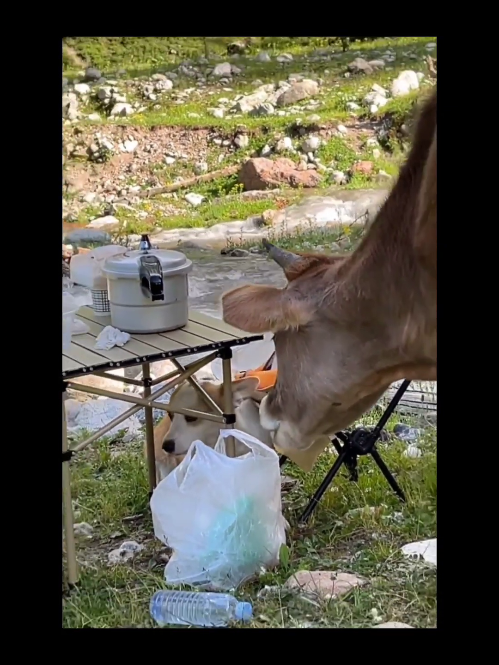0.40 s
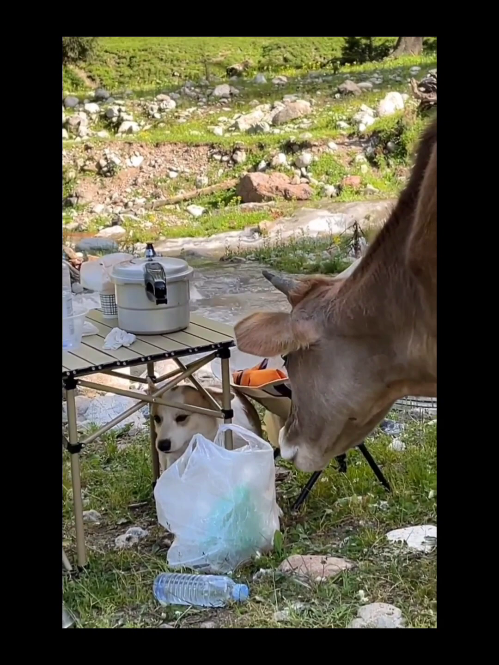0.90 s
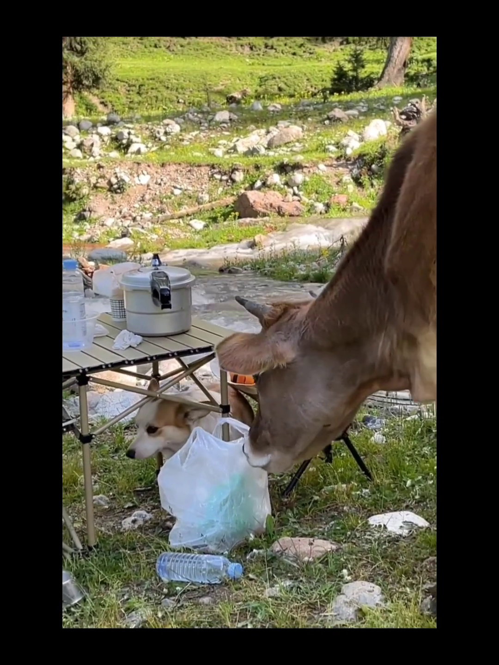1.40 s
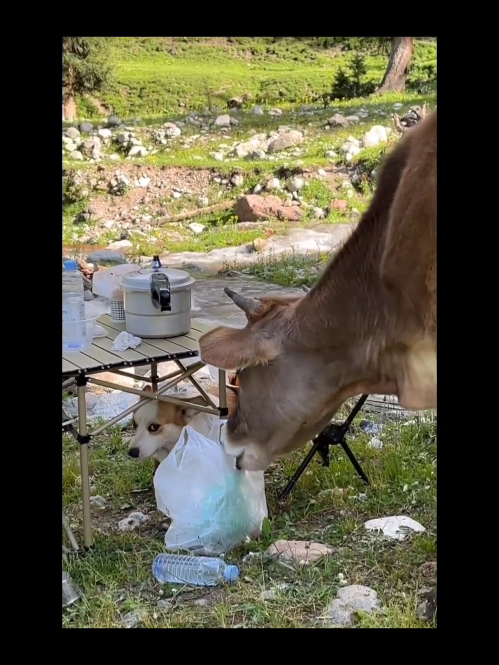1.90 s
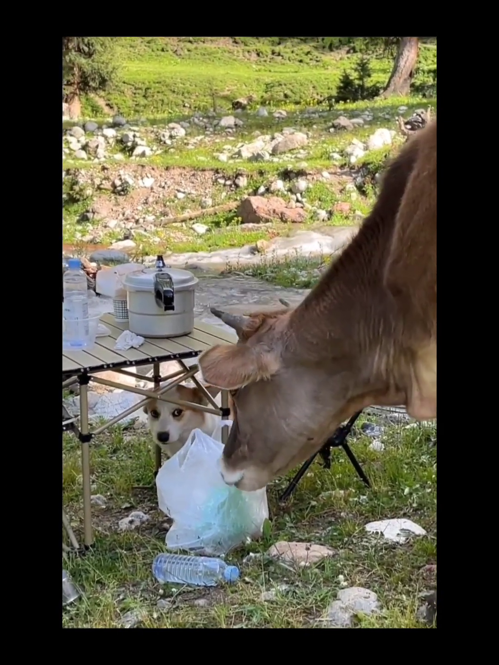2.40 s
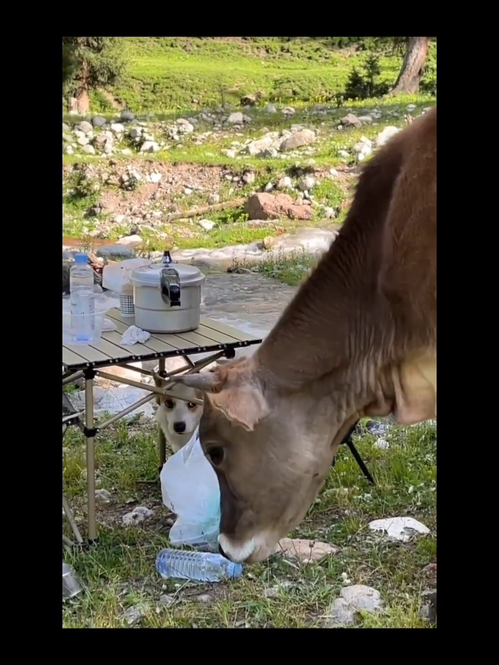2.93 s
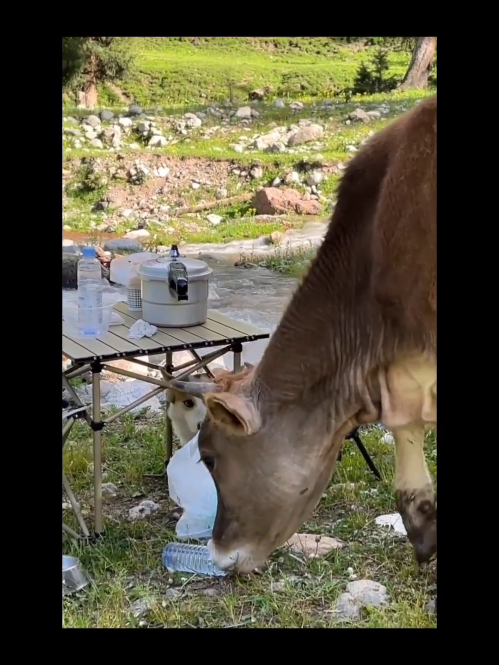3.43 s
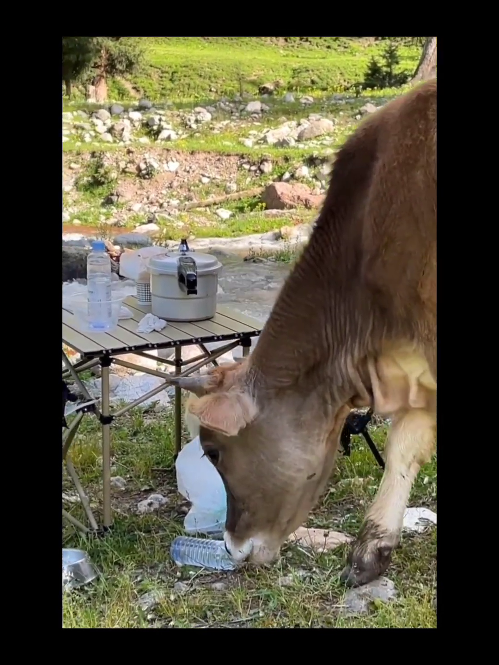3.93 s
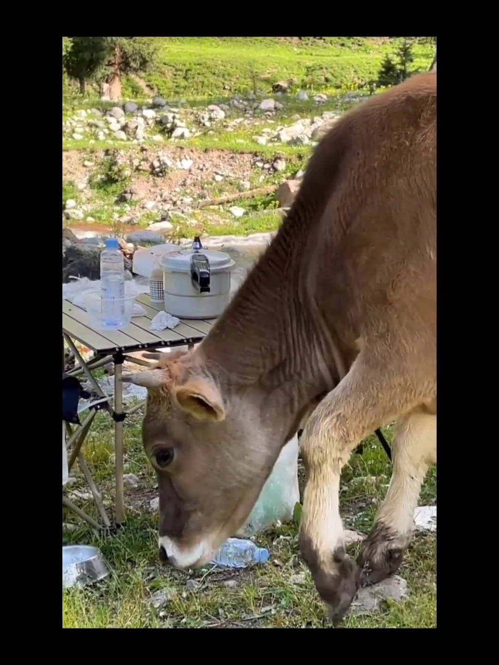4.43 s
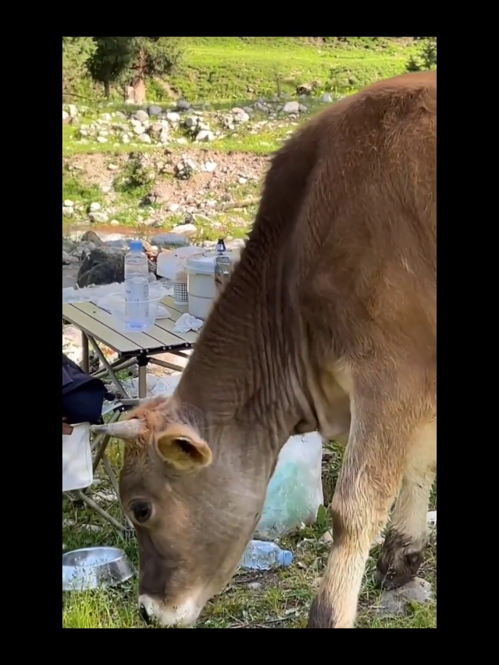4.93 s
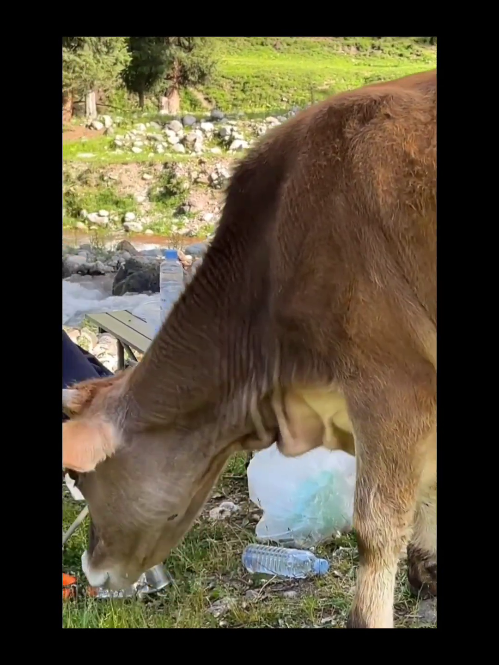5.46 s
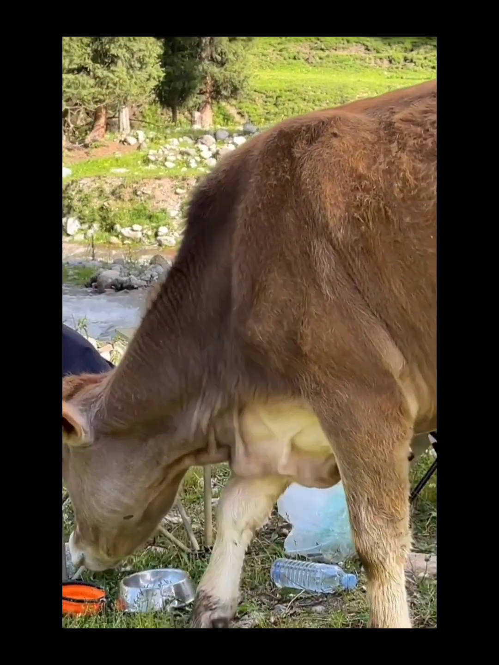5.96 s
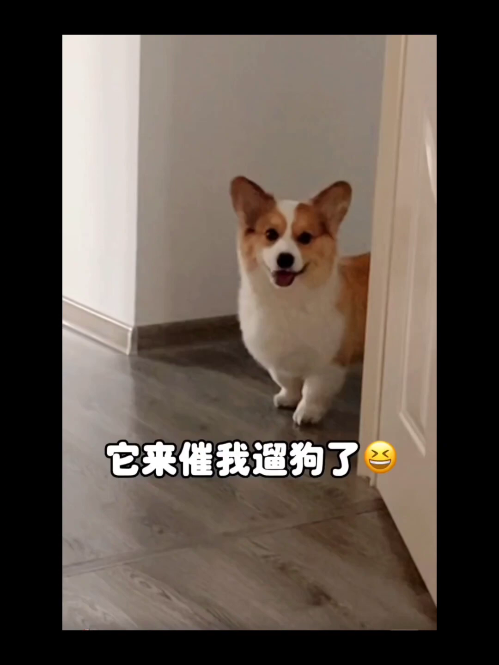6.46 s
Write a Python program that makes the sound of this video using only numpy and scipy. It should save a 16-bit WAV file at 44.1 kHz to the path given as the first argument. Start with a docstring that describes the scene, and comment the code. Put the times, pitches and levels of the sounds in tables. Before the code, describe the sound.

Outdoors beside a fast stream, water rushes continuously over rocks some way off: deep rumble, gurgling mid rush and patchy bright spray. A hand-held phone catches wind pops and buffeting on the left at the very start, briefly before one second, and thickly in the last half second. Faint thin high tones sit in the hiss. It stops short. The grazing cow and the dog make no sound.

```python
"""A fast stream rushes over rocks some way off, heard by a hand-held phone with two microphone ports.
Plunging water rumbles, rapids rush and gurgle, spray hisses: patchy noise with swarms of bubble rings.
Thin tones stand in quiet slices of the top hiss, one slice flickers. Gusts pop on the left as falling
chirps over noise buffets, and push the phone's gain down. The sound stops short with a faint low murmur."""
import sys
import numpy as np
from scipy import signal
from scipy.fft import rfft, irfft, next_fast_len
from scipy.io import wavfile
from scipy.ndimage import uniform_filter1d, map_coordinates

SR = 44100
rng = np.random.default_rng(int(sys.argv[2]) if len(sys.argv) > 2 else 0)


def to_wav(s):
    """Save 16-bit WAV."""
    ch = np.atleast_2d(s).T  # columns
    pcm = np.round(np.clip(ch, -1, 1) * 32767)  # PCM
    wavfile.write(sys.argv[1], SR, pcm.astype(np.int16))


def voltage_ratio(level):
    """Linear amplitude factor for a level in decibels (scalar or array-like)."""
    return 10 ** (np.asarray(level, float) / 20)


N = 290604


def unit(x):
    """Scales a sound, or a pair taken together, to an rms of 1."""
    return x / np.sqrt(np.mean(x ** 2) + 1e-20)


def curve(points):
    """One value per sample, on straight lines between (time [s], value) points."""
    s, value = np.transpose(points)
    return np.interp(np.arange(N) / SR, s, value)


def along(points, hz):
    """Values at hz, between (frequency [Hz], value) points on a log axis."""
    f, value = np.transpose(points)
    return np.interp(np.log(hz + 1), np.log(f + 1), value)


def wobble(rate):
    """A smooth random curve, rate knots a second."""
    knots = rng.standard_normal(int(N * rate / SR) + 4)
    return map_coordinates(knots, [np.arange(N) * rate / SR])


def filtered(x, response):
    """Filters x by a real or complex response of frequency."""
    m = next_fast_len(N + 8192)
    spectrum = rfft(x, m) * response(np.fft.rfftfreq(m, 1 / SR))
    return irfft(spectrum, m)[..., :N]


def stream():
    """The flow of the whole stream drives its rumble, its rush and its spray, each by its own share."""
    # The flow, as the level of the spray: (time [s], level [dB])
    flow = [(0, -27.5), (.8, -27), (1.1, -28), (1.6, -25.5), (2.3, -24.5), (2.6, -26), (3.4, -24.5),
            (4.2, -26.5), (4.7, -25), (5.2, -27), (5.6, -29), (5.85, -29.5), (6.05, -27.5)]
    spray_db = curve(flow)
    swell_db = spray_db - spray_db.mean()
    surge_db = 0.22 * wobble(rate=7.2) + 0.85 * wobble(rate=16)  # quick swells shared by rapids and spray
    return rumble(swell_db) + rush(swell_db, surge_db) + spray(spray_db, surge_db)


def rumble(swell_db):
    """Big plunges of water rumble: low noise that follows the flow a little and swells on its own."""
    # Colour of the rumble: (frequency [Hz], relative level [dB])
    colour = [(20, -50), (31, -37.5), (45, -14.5), (60, -8), (85, -5.5), (125, -2.5), (180, -1.5),
              (215, -5.5), (260, -9), (400, -16.5), (700, -99)]
    # Its own slow swells: (time [s], level [dB])
    roar = [(0, -4), (.6, -0.5), (1.2, -2.5), (1.7, -1.5), (2.4, -1), (3, -0.5), (3.7, -1), (4.3, -1),
            (4.8, 0), (5.3, -1), (5.6, -1.5), (5.8, -2.5), (6.05, 1)]
    level_db = -15 + 0.22 * swell_db + curve(roar)
    churn_db = 0.56 * wobble(rate=3.8) + 0.84 * wobble(rate=14)
    return voltage_ratio(level_db + churn_db) * water(colour, patchy_db=0.6)


def rush(swell_db, surge_db):
    """The rapids rush as mid-range noise, with trapped air gurgling in it as slow-dying bubble rings."""
    # Colour of the rapids: (frequency [Hz], relative level [dB])
    colour = [(120, -95.5), (250, -21), (400, -7), (490, -4), (540, -7.5), (700, -7.5), (850, -12.5),
              (1200, -16), (1400, -23.5), (1900, -27), (4000, -99)]
    gurgle = voltage_ratio(-14.5) * bubbles(count=2500, mid_hz=701.4, spread=0.8914, turns=8.72, size_db=3, size=1000)
    level_db = -18.5 + 0.76 * swell_db + surge_db
    return voltage_ratio(level_db) * water(colour, patchy_db=0.6, grains=gurgle)


def spray(spray_db, surge_db):
    """Spray hisses as patchy bright noise, with splashes and the fizz of tiny bubbles ringing in it."""
    # Colour of the hiss: (frequency [Hz], relative level [dB])
    colour = [(700, -56), (1300, -2), (1800, -7), (2350, -2), (2570, -2.5), (2770, -4), (4100, -10.5),
              (4600, -8), (5300, -9.5), (6400, -11.5), (7600, -12.5), (7700, -20.5), (9200, -15),
              (11500, -20), (13200, -19), (13700, -22.5), (14300, -25)]
    splash = voltage_ratio(-17) * bubbles(count=2500, mid_hz=2915, spread=0.595, turns=12, size_db=4.5, size=400)
    fizz = voltage_ratio(-11.0) * bubbles(count=7000, mid_hz=5160, spread=0.797, turns=3.9, size_db=4.5)
    hiss = water(colour, patchy_db=1.86, grains=fizz + splash)
    hiss = voltage_ratio(spray_db + 0.75 * surge_db) * hiss
    # The hiss thins at the very top
    return filtered(hiss, lambda hz: voltage_ratio(np.interp(hz, [14350, 14500, 15400], [0, -7, -12])))


def water(spectrum, patchy_db, grains=0):
    """Two unrelated strands of rms 1: noise plus grains, in shared patches of random strength."""
    z = signal.stft(rng.standard_normal((2, N)) + grains, nperseg=512)[2]
    field = rng.standard_normal(z.shape[1:])
    field = uniform_filter1d(field, size=2, axis=0)  # patch height in frequency bins
    field = uniform_filter1d(field, size=5, axis=1)  # patch length in frames
    pair = signal.istft(z * voltage_ratio(patchy_db * unit(field)), nperseg=512)[1][:, :N]
    return unit(filtered(pair, lambda hz: voltage_ratio(along(spectrum, hz))))


def bubbles(count, mid_hz, spread, turns, size_db, size=256):
    """Two unrelated swarms of short damped rings, soft at the start, pitch rising as they near the surface."""
    when, pitch, loud = rng.random((3, 2 * count))
    hz = np.clip(mid_hz * np.exp(spread * (2 * pitch - 1)), 60, 15000)[:, None]
    cycle = np.arange(size) * hz / SR
    life = cycle / turns
    envelope = life * np.exp(-3 * life) * np.sqrt(hz)
    ring = np.sin(2 * np.pi * cycle * (1 + 0.118 * life)) * envelope
    ring *= voltage_ratio(size_db * (2 * loud - 1))[:, None]
    # Both swarms are laid on one line of double length, then parted
    at = (when[:, None] * 2 * N).astype(int) + np.arange(size)
    line = np.bincount(at.ravel(), ring.ravel(), 2 * N + size)[:2 * N]
    return unit(line.reshape(2, N))


def ports(strands):
    """Left and right share one strand, shaded and phase-shifted at the left; the other sets them apart."""
    # How left and right differ in level, phase and likeness
    # Left over right: (frequency [Hz], level [dB])
    shade = [(100, 0), (180, -1), (260, -3), (400, -10), (520, -11), (700, -6), (850, 2), (1200, 2),
             (1600, 0), (16000, 0)]
    # Left ahead of right: (frequency [Hz], phase lead [rad])
    lead = [(40, 0), (260, -.6), (500, -1.5), (600, -4.2), (950, -5.5), (1300, -6.3), (1850, -6.3),
            (2350, -4.6), (2580, -3.5), (2800, -4.2), (3750, -5.7), (4500, -4.8), (5050, -5), (5500, -3.14),
            (6350, -3.14), (6700, -2), (7700, 0), (8300, 0), (8900, 1.8), (9600, 0), (11000, 2),
            (12300, .2), (13800, 3.14), (15000, 3.14)]
    # Likeness of the two: (frequency [Hz], correlation [0-1])
    alike = [(40, .92), (110, .87), (230, .9), (380, .72), (560, .2), (750, .8), (1300, .72), (1750, .9),
             (2200, .72), (2450, .85), (2600, .93), (2750, .85), (3000, .7), (3500, .55), (5380, .55),
             (5480, 1), (6120, 1), (6250, .95), (6500, .5), (7650, .4), (7800, .9), (8100, .9), (8300, .3),
             (9400, .6), (11000, .4), (12300, .5), (13600, .3), (13800, 1), (14600, 1), (15000, .3)]

    def mix(hz):
        turn = np.arccos(np.clip(along(alike, hz), 0, 1)) / 2
        return np.array([np.cos(turn), np.sin(turn)])

    common, apart = filtered(strands, mix)
    left = filtered(common + apart, lambda hz: voltage_ratio(along(shade, hz)) * np.exp(1j * along(lead, hz)))
    # The hand sways the phone: the phase between left and right wanders in one band
    sway_rad, sway_hz, sway_width_hz = 0.5, 2600, 400
    hz, s, z = signal.stft(left, SR, nperseg=1024)
    sway = np.interp(s, np.arange(N) / SR, wobble(rate=4.92))
    band = np.exp(-((hz[:, None] - sway_hz) / sway_width_hz) ** 2)
    z = z * np.exp(1j * sway_rad * band * sway)
    left = signal.istft(z, SR, nperseg=1024)[1][:N]
    return np.array([left, common - apart])


def with_thin_tones(x):
    """A slice of hiss goes quiet while a tone of wavering level stands in it; another slice flickers."""
    # Thin tones: (start [s], end [s], pitch [Hz], mean peak level [dB])
    thin_tones = [(0, 3.28, 12920, -55.5), (3.95, 6.05, 12920, -55.5), (.25, 1.8, 12231, -52.5),
                  (3.9, 4.42, 12231, -52.5), (1.28, 1.55, 10164, -51.5), (1.9, 5.9, 10164, -45.5),
                  (1.9, 2.37, 10853, -42.5), (0, 6.05, 14987, -59)]
    below_hz, above_hz = 500, 130  # reach of the quiet slice around its tone
    hz, s, z = signal.stft(x, SR, nperseg=1024)
    t, tones = np.arange(N) / SR, np.zeros(N)
    # One slice of hiss keeps dropping out
    gone = uniform_filter1d(rng.standard_normal(len(s)), size=15) > -.06
    flicker = (hz > 7680) & (hz < 8350)
    z = z * np.where(flicker[:, None] & gone, voltage_ratio(-41.0), 1)
    for start, stop, tone_hz, db in thin_tones:
        inside = (hz > tone_hz - below_hz) & (hz < tone_hz + above_hz)
        during = (s > start) & (s < stop)
        z = z * np.where(inside[:, None] & during, voltage_ratio(-50.0), 1)
        on = uniform_filter1d(1. * ((t > start) & (t < stop)), size=800)  # soft ends
        tones += on * voltage_ratio(db + 3 * wobble(rate=24)) * np.sin(2 * np.pi * tone_hz * t)
    return signal.istft(z, SR, nperseg=1024)[1][:, :N] + tones


def wind():
    """Gusts pop and buffet at the left; the right channel carries them weaker and upside down."""
    pair = np.array([[1], [-.4]])
    return (voltage_ratio(6.5) * pops() + buffets()) * pair


def pops():
    """Each eddy past the port is a pop whose pitch drops from a tick to a thump within a few cycles."""
    # Strong pops: (time [s], relative level [dB])
    puffs = [(0.066, -12), (0.181, -11), (0.864, -11), (5.568, -9), (5.588, -14), (5.618, -13),
             (5.631, -14), (5.657, -10), (5.676, -10), (5.702, -12), (5.734, -12), (5.753, -14),
             (5.781, -11), (5.816, -10), (5.855, -9), (5.874, -11), (5.909, -10), (5.969, -10),
             (6.025, -11)]
    # Spans in which weaker pops come at random: (start [s], end [s])
    gusts = [(.15, .29), (.87, .92)]
    small_per_s, small_db = 30, -16  # the level is on the scale of the strong pops
    out, t = np.zeros(N), np.arange(2048) / SR
    small = [(s + rng.uniform(0, .8 / small_per_s), small_db + rng.normal(0, 1.2))
             for start, stop in gusts for s in np.arange(start, stop, 1 / small_per_s)]
    every = puffs + small
    for (s, db), (bend, thump) in zip(every, rng.standard_normal((len(every), 2))):
        hz = (150 + 1000 * np.exp(-t / .002)) * np.exp(.06 * bend)
        decay = np.exp(-t / .003) + .35 * voltage_ratio(3 * thump) * np.exp(-t / .014)
        shape = (1 - np.exp(-(t / .0016) ** 2)) * decay
        pop = voltage_ratio(db) * shape * np.sin(2 * np.pi * np.cumsum(hz) / SR)
        out[round((s - .002) * SR):][:len(t)] += pop  # starts 2 ms ahead of its listed time
    return out


def buffets():
    """Wind buffets the port: low noise under a quickly fluttering level."""
    # Strength of the buffeting: (time [s], level [dB])
    strength = [(0, -41.5), (.07, -21.5), (.3, -19), (.4, -48.5), (.82, -43.5), (.88, -34), (.97, -53.5),
                (5.1, -47), (5.2, -35), (5.35, -42), (5.57, -22), (5.7, -20), (5.8, -23), (6.05, -25.5)]
    # Its colour: (frequency [Hz], relative level [dB])
    colour = [(30, -32), (60, -8), (140, -2), (250, -13.5), (600, -32), (900, -91.5)]
    level_db = curve(strength) + 2.4 * wobble(rate=44)
    return voltage_ratio(level_db) * water(colour, patchy_db=-2.0)[0]


def scene():
    """The stream at both ports, with thin tones standing in its top hiss, then wind, strongest on the left."""
    return with_thin_tones(ports(stream())) + wind()


def gain_control(x):
    """A peak over the knee pulls both channels down quickly; the gain then climbs back at a steady pace."""
    knee_db, squeeze, recover_db_per_s, attack_s = -8, 0.6, 16, 0.0078
    peak_db = 20 * np.log10(np.abs(x).max(axis=0) + 1e-9)
    need_db = squeeze * np.clip(peak_db - knee_db, 0, None)
    # A running maximum on a rising ramp holds each cut and lets it go at the ramp's pace
    climb_db = recover_db_per_s * np.arange(N) / SR
    held_db = np.maximum.accumulate(need_db + climb_db) - climb_db
    return x * voltage_ratio(-uniform_filter1d(held_db, size=max(1, round(attack_s * SR))))


def band_limit(x):
    """A steep low-pass at the top of the band."""
    return signal.sosfilt(signal.butter(12, 15430, fs=SR, output="sos"), x)


def record(dry):
    """The gain is ridden, then the sound is cut off; the coupling high-pass then drains its stored bass."""
    stop_s, linger_s = 6.048, .062  # a faint low murmur lingers after the stop
    ridden, t = gain_control(dry), np.arange(N) / SR
    low = filtered(ridden, lambda hz: hz < 350)
    murmur = voltage_ratio(-45) * low * ((t >= stop_s) & (t < stop_s + linger_s))
    cut = ridden * (t < stop_s) + murmur
    coupling = signal.butter(1, 50, "high", fs=SR, output="sos")
    coupled = signal.sosfilt(coupling, cut)
    return band_limit(coupled)


dry = scene()
out = record(dry)
to_wav(out)
```